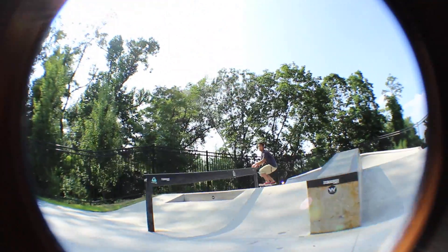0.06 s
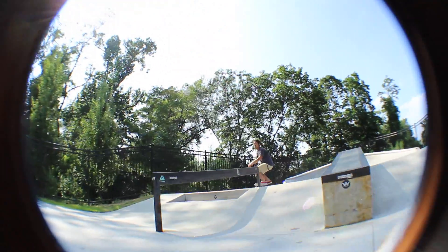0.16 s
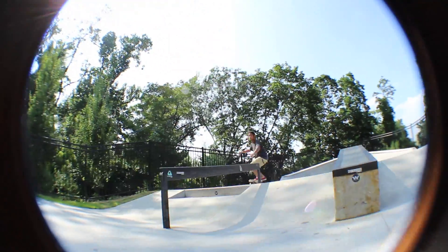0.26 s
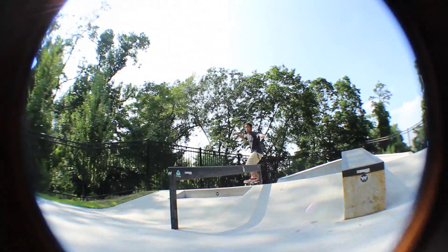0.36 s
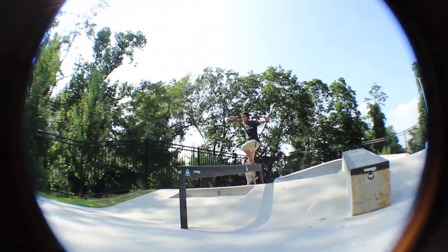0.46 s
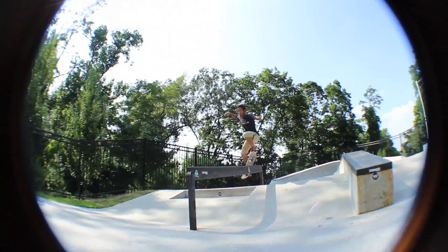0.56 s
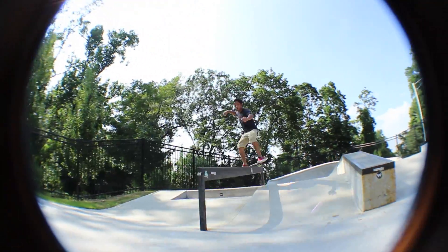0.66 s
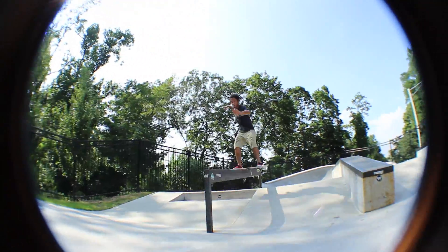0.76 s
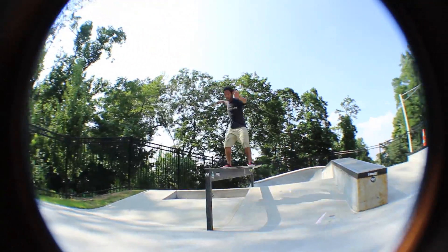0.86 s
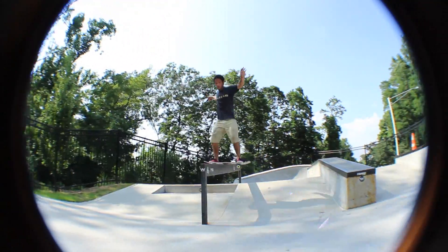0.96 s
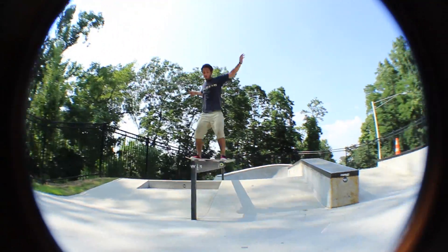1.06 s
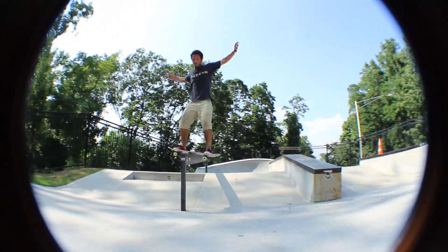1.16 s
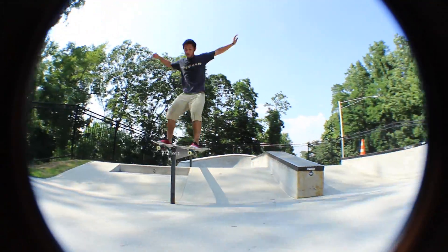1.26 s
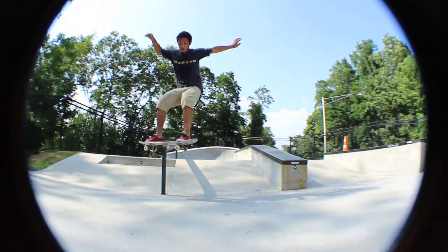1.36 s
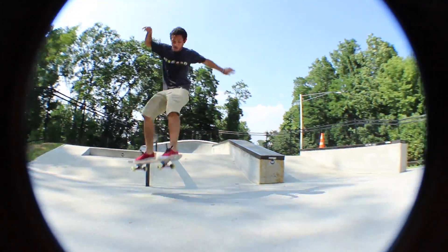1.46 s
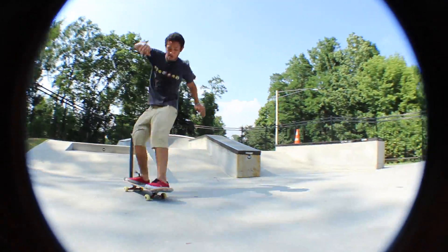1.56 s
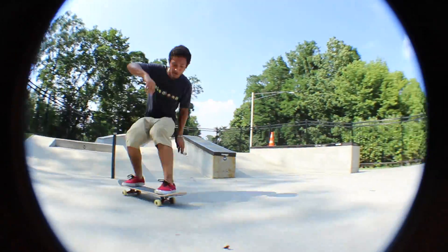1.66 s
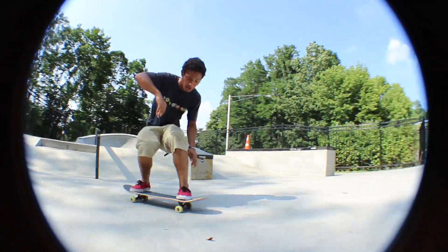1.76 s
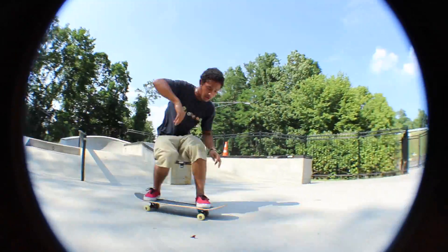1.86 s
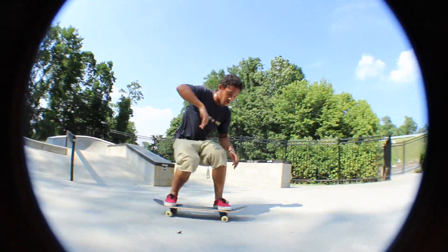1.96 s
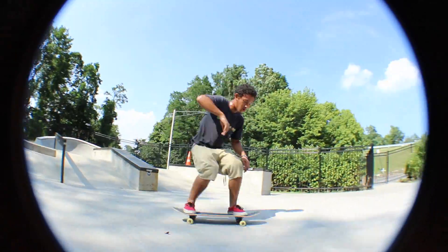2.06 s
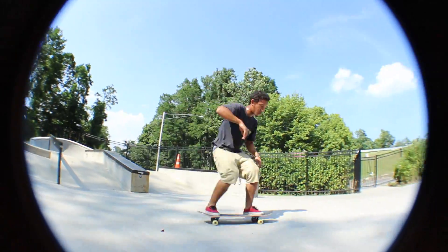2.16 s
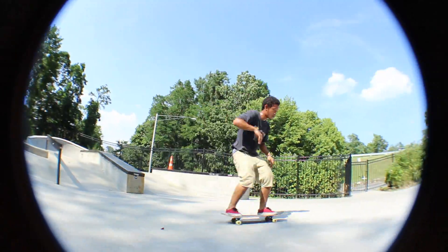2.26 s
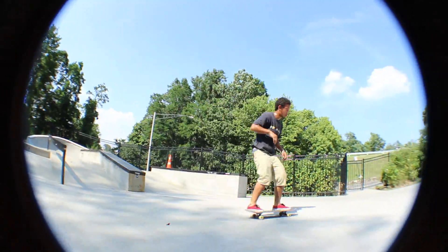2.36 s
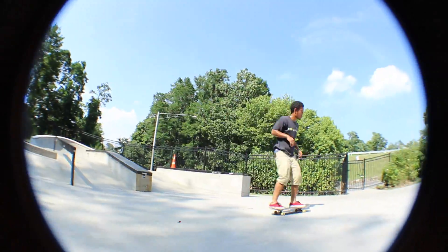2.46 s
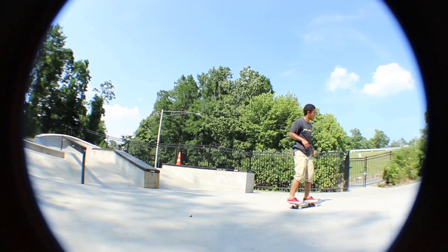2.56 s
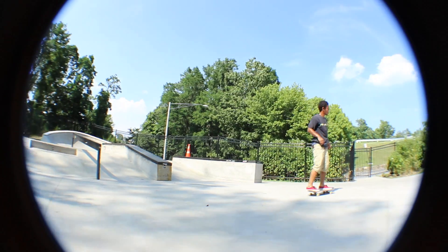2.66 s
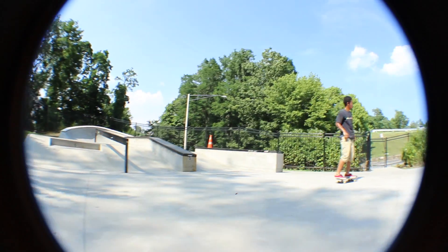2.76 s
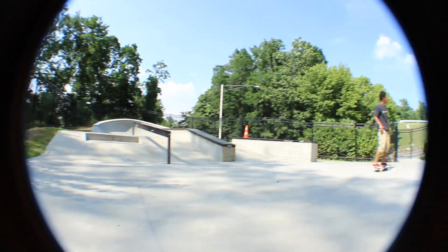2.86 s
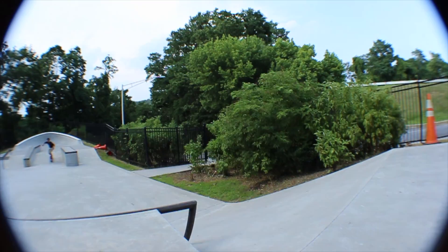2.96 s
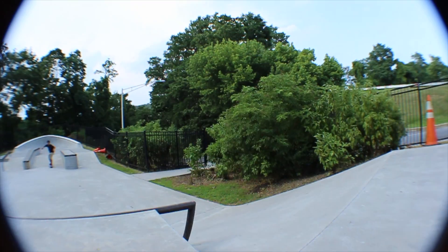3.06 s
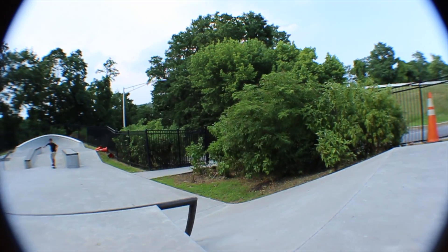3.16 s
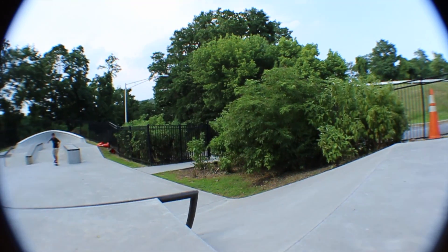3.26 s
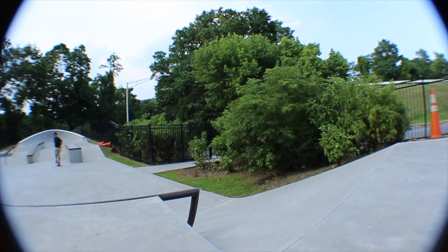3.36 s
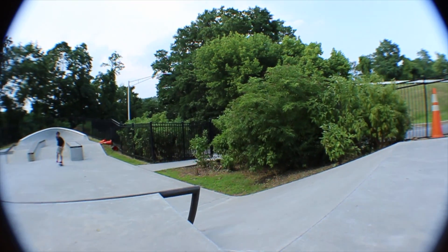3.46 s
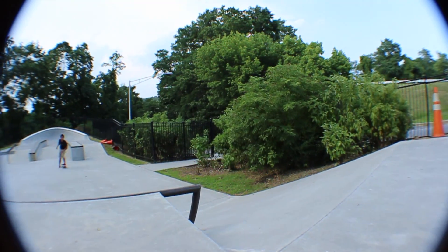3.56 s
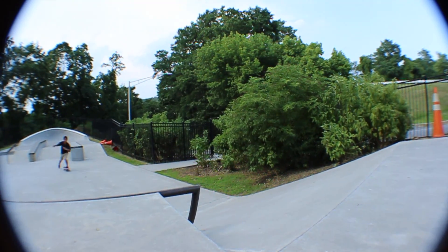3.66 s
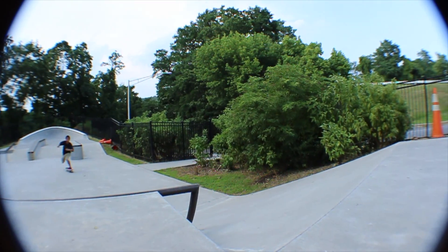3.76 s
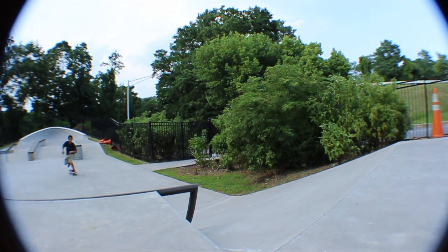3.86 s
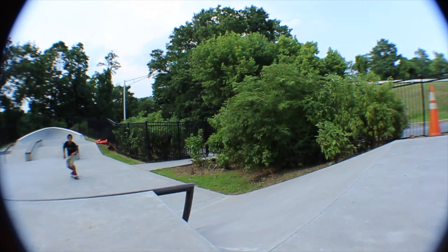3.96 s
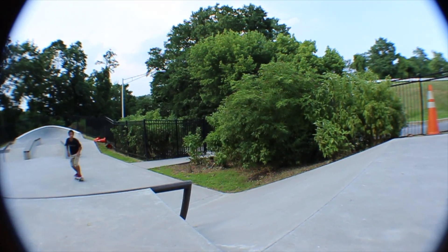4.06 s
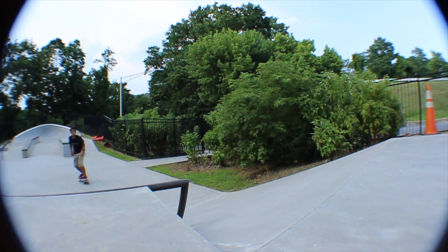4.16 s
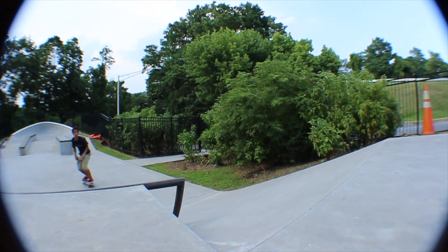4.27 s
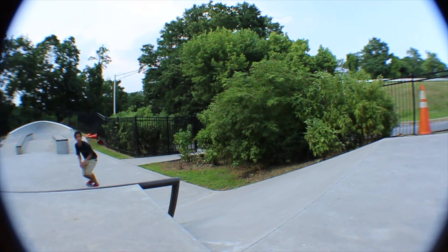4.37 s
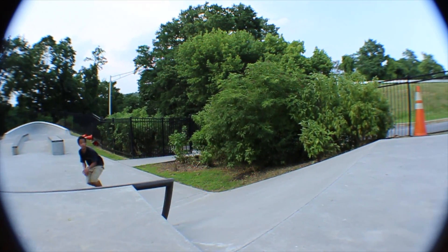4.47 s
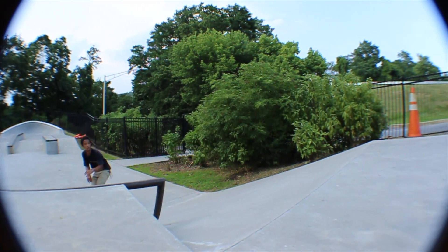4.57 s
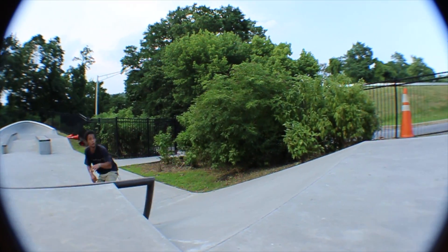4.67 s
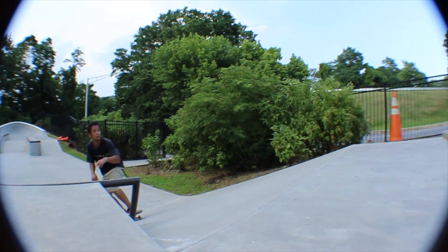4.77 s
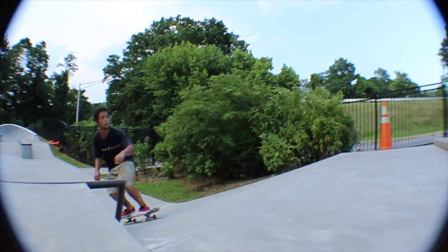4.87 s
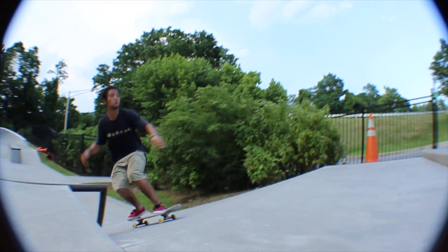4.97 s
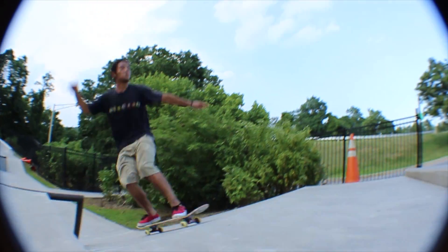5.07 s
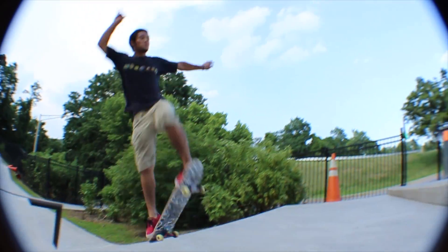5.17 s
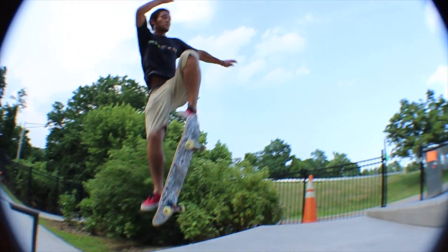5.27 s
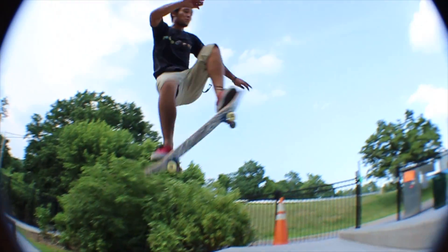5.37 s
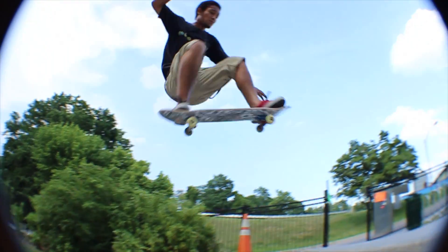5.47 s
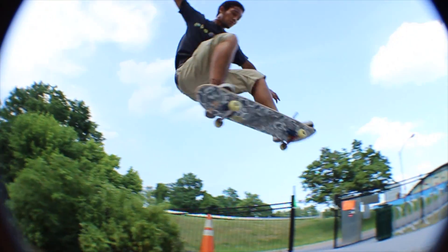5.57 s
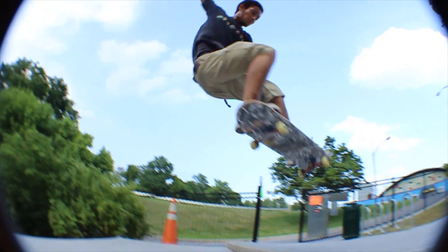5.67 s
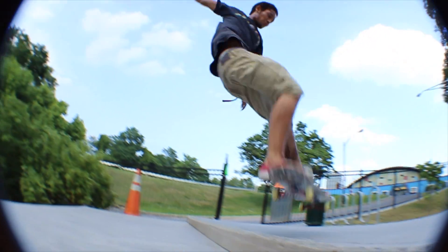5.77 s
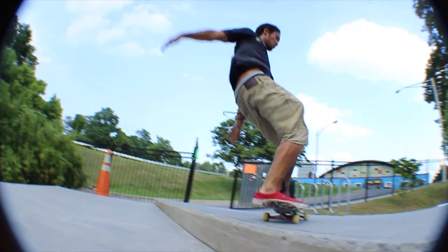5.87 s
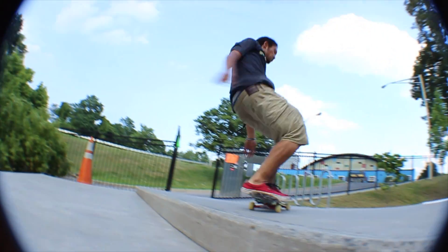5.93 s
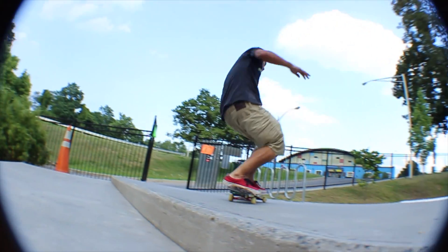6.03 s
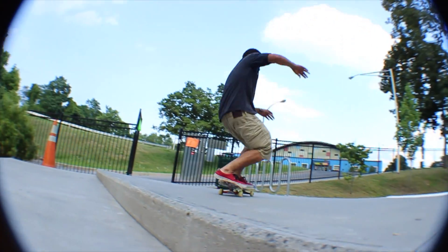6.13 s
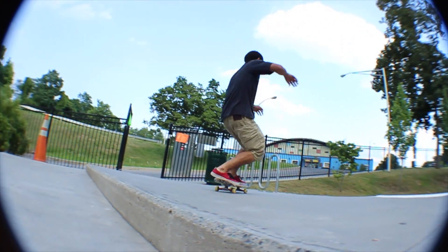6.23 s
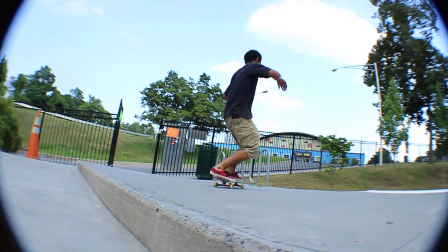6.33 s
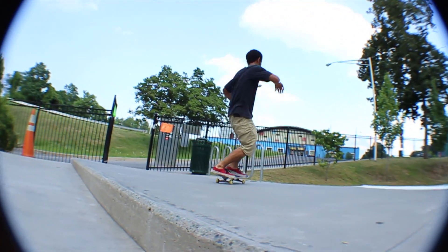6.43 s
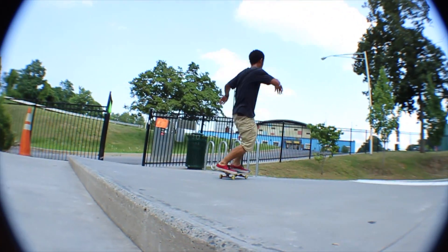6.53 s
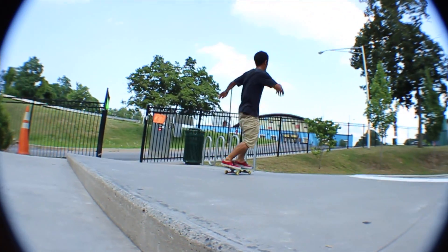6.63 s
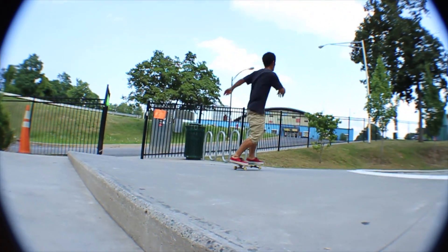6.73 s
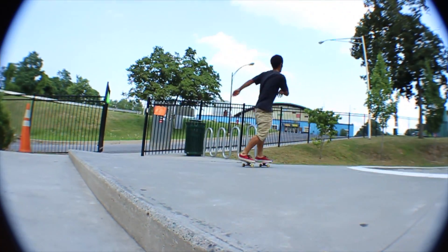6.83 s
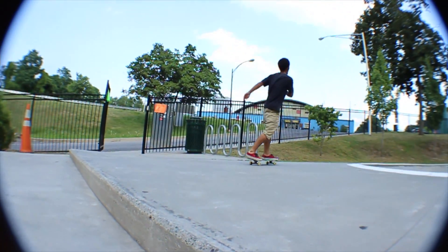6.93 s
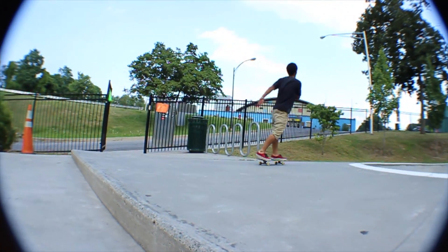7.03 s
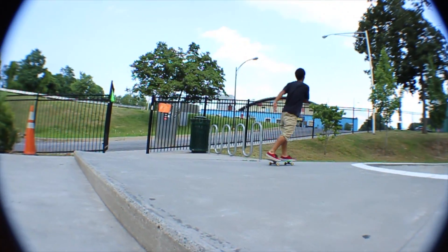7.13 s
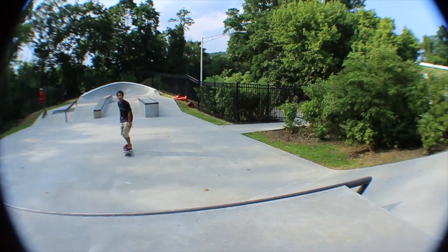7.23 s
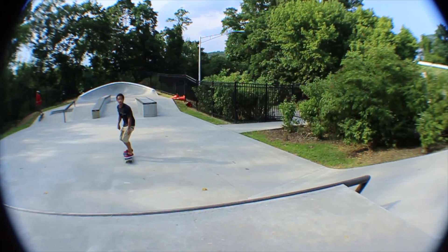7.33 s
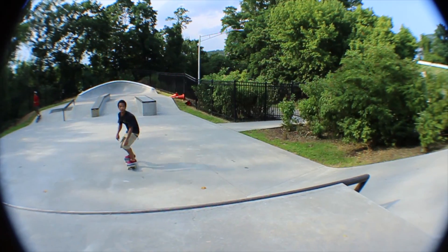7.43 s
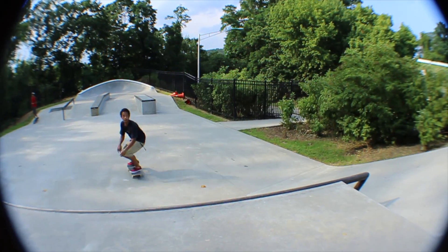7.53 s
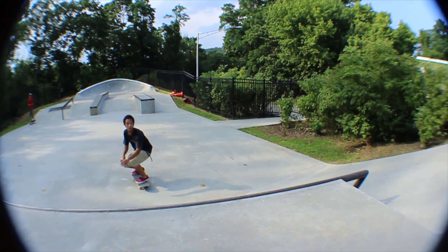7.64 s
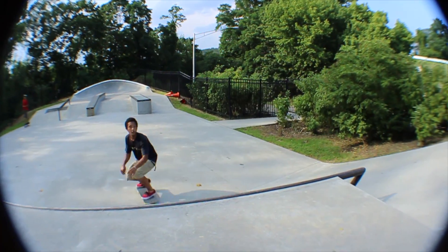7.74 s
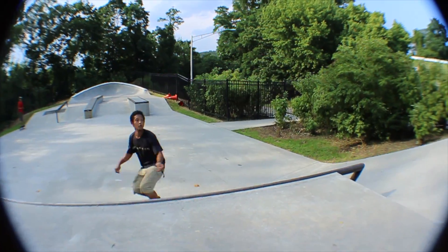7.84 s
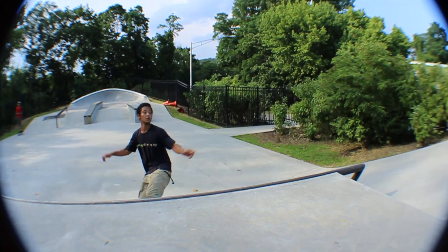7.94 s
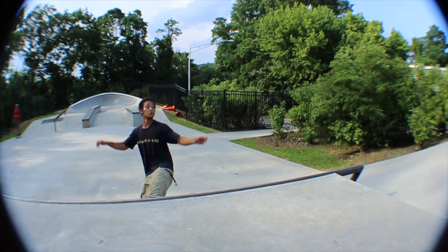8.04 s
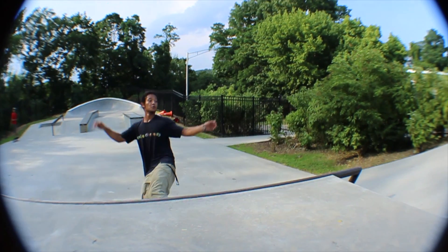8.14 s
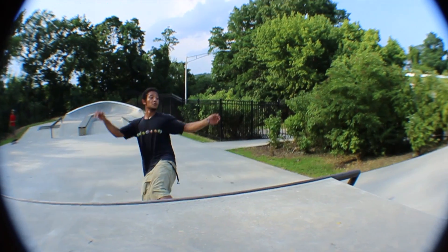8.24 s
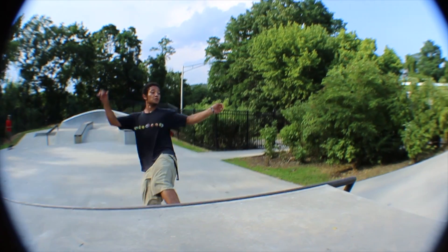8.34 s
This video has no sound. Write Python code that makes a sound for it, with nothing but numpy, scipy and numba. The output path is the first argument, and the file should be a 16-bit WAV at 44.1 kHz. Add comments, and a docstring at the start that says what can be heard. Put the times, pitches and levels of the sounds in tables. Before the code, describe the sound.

Skateboard wheels roar over skatepark concrete, a board clacks onto a ringing steel rail, then two loud landing clacks punctuate the rolling.

```python
"""A concrete skatepark, three shots in a row: a rail slide, a jump out of a bank, an approach.
Wheels roar as shaped noise and ring the deck through moving band-passes; grit and bearings hiss.
The board clacks as noise bursts ring its modes, a steel rail rings on, free wheels whirr in the air.
Distant traffic drones behind, with far hiss and wind low on the microphone.
The camera flattens the loud clacks, pulls its gain down fast and lets it creep back."""
import sys
import numpy as np
from scipy import signal
from scipy.fft import rfft, irfft, next_fast_len
from scipy.io import wavfile
from scipy.ndimage import uniform_filter1d
from numba import njit

SR = 44100
rng = np.random.default_rng(int(sys.argv[2]) if len(sys.argv) > 2 else 0)


def master(y):
    """Save y as 16-bit WAV."""
    cut = np.clip(np.atleast_2d(y).T, -1, 1)
    pcm = np.round(cut * 32767)  # scale
    wavfile.write(sys.argv[1], SR, pcm.astype(np.int16))


def field_ratio(decibels):
    """Amplitude ratio for a level in dB (20 dB per decade); scalars and array-likes work."""
    return 10 ** (np.asarray(decibels, dtype=float) / 20)


N = 370440
END_S = 7.95

# Wheel noise; new shots start at 2.97 and 7.24 s.
# Each row: time in seconds, wheel roar in dB, treble in dB (drives both grit and bearing hiss).
ROLL = [(0.0, -31.5, -44.5), (0.3, -28.5, -44), (0.55, -28, -40.5), (0.8, -31, -41), (1.0, -36, -46),
        (1.2, -30.5, -48), (1.375, -26, -36.5), (1.53, -29.5, -40), (1.7, -26, -37), (2.1, -26, -42),
        (2.5, -28.5, -41.5), (2.875, -31, -47.5), (2.969, -31, -49), (2.975, -27.5, -42.5),
        (3.125, -27, -39), (3.27, -32.5, -44), (3.39, -32, -44), (3.5, -25, -40.5), (3.625, -26.5, -37),
        (3.8, -29.5, -40), (4.3, -28, -39), (4.7, -28.5, -41), (5.0, -35, -37), (5.24, -26.5, -39),
        (5.375, -36, -37), (5.65, -31.5, -38.5), (5.875, -26.5, -37), (6.125, -29, -43), (6.4, -25, -42.5),
        (6.7, -27.5, -42.5), (7.0, -31, -50), (7.235, -34.5, -53), (7.25, -29, -39), (7.4, -29.5, -39.5),
        (7.65, -27.5, -37.5), (7.94, -30.5, -45)]
# Low rumble, rising and falling. Each row: time in seconds, level in dB.
LOW = [(0.0, -28.5), (0.5, -31), (0.88, -37), (1.1, -33.5), (1.375, -29.5), (1.55, -34), (2.25, -30),
       (2.55, -29), (2.82, -30.5), (2.85, -30), (2.92, -21), (2.97, -32.5), (3.1, -30), (3.25, -36.5),
       (3.45, -31.5), (4.4, -29.5), (4.8, -33.5), (5.12, -32), (5.27, -39.5), (5.6, -36.5), (5.9, -31),
       (6.55, -27.5), (7.0, -29), (7.24, -31), (7.4, -33), (7.7, -31), (7.94, -38)]
# Ring of the deck. Each row: time in seconds, level in dB, pitch in Hz.
DECK = [(0.0, -29, 530), (0.4, -31, 480), (0.7, -30.5, 580), (0.9, -32.5, 560), (1.1, -38, 603),
        (1.4, -31.5, 533), (1.8, -33.5, 555), (2.1, -33.5, 546), (2.9, -30.5, 542), (3.1, -39, 675),
        (3.25, -36, 660), (3.4, -39.5, 684), (3.8, -29, 623), (4.125, -27, 600), (4.25, -38, 650),
        (4.42, -26.5, 576), (4.52, -25.5, 560), (4.6, -28, 520), (4.7, -23, 540), (4.78, -25.5, 530),
        (4.86, -32.5, 540), (4.93, -24.5, 566), (5.02, -25.5, 524), (5.12, -29, 625), (5.17, -39.5, 610),
        (5.22, -27.5, 600), (5.7, -67, 660), (5.875, -31.5, 597), (6.2, -50.5, 621), (6.6, -36, 610),
        (6.85, -38, 680), (7.24, -36.5, 724), (7.244, -32.5, 480), (7.32, -32, 470), (7.35, -60, 500),
        (7.43, -51, 510), (7.45, -26, 510), (7.52, -36, 505), (7.6, -28, 519), (7.72, -24.5, 524),
        (7.85, -26.5, 506), (7.93, -23, 487)]
USUAL_TREBLE_DB, HISS_DB = -40, -48
HISS_STEEPNESS = 2.4  # dB of bearing hiss per dB of treble
AIR_GRIT_DB = -4  # grit is a little weaker while the wheels are off the ground

# Tail pops and landings. Each row: start in seconds, blow in dB, thud in dB re blow,
# crack in dB re blow, contact time in ms, crack pitch in Hz, favoured board tone in Hz.
HITS = [(0.5567, -1.5, -20, 1.5, 7.9, 3600, 950), (0.7560, 1, -14, -2, 5.5, 2400, 850),
        (1.6065, 15.5, -10.5, -6, 8.5, 2770, 950), (1.6186, 13.5, -25.5, -6, 8.4, 2760, 1405),
        (1.6263, 12.5, -18.5, -9.5, 4.6, 2900, 1300), (1.6419, 9, -10.5, -4, 3.8, 4280, 900),
        (5.125, -13, -17, -6.5, 2.5, 8010, 1203), (5.133, -11.5, -24.5, -13, 9.7, 2000, 990),
        (5.238, 10, -9, -8, 3.6, 5180, 1200), (5.2445, 3, -17.5, -6, 4, 4510, 1160),
        (5.8700, 18.5, -3, -8.5, 13.24, 2660, 660), (5.885, 12.5, -10.5, -8.5, 3.2, 3380, 550)]
# Small pitched knocks of the wheels and board, mostly over joints in the concrete.
# Each row: start in seconds, blow in dB, crack in dB re blow, contact time in ms, knock tone in Hz.
KNOCKS = [(0.715, -20.5, -35, 2.8, 1680), (1.4, -19.5, -4, 3.5, 1540), (3.1527, -4.5, -16, 3.8, 987),
          (3.2037, -7, -24.5, 3.2, 1070), (3.646, -15, -14, 3.2, 1250), (4.7443, -10, -41, 8.6, 1174),
          (5.0705, -14.5, -28, 2.3, 740), (6.124, -10, -47, 1.7, 1720), (6.2176, -14, -39, 3.13, 1600),
          (6.332, -12, -36, 3, 1580), (6.652, -13, -15, 2.1, 1600), (6.833, -3.5, -15, 9.1, 1593),
          (6.9025, -10.5, -12.5, 2, 1580), (7.1555, -19.5, -13, 1.4, 1220), (7.312, -21, -18, 9.6, 1100),
          (7.365, -15.5, -28, 7.5, 1518), (7.853, -11, -18, 13, 1130), (7.914, -5, -22.5, 7.7, 1180)]
KNOCK_THUD_DB, KNOCK_CRACK_HZ = -32, 3500  # thud re blow
# Modes of the wooden board. Each row: pitch in Hz, level in dB, free decay t60 in seconds.
BOARD = [(480, -6, .013), (670, -3, .012), (860, -3, .013), (1060, -2, .016), (1250, 0, .014),
         (1570, -2, .012), (1850, -4, .01), (2150, -5, .009), (2800, -5, .007), (3700, -5, .006),
         (5100, -8, .004)]
KNOCK_T60_SHARE = .55  # the board rings shorter in a small knock
RISE_MS = 1.2  # time constant of a blow's onset

# Modes of the steel rail. Each row: pitch in Hz, level in dB, decay t60 in seconds.
RAIL = [(343, -4.5, 1.5), (646, .5, 2.), (969, -9, .2), (1750, -12, .15), (2283, -9, .6), (2640, -11, .15),
        (2923, -9, .22), (3128, -7, .25), (3520, -11, .14), (3990, -5, .25), (4400, -13, .1)]
RAIL_HIT_S, RAIL_DB, RAIL_MUTED_S = .7558, -21.5, 1.22
# The deck grinds along the rail and leaves it.
# Each row: time in seconds, level in dB, scrape pitch in Hz.
GRIND = [(1.14, -62, 3810), (1.2, -53, 3850), (1.3, -45, 4150), (1.4, -47, 3800), (1.5, -46, 3670),
         (1.6, -42, 3550), (1.61, -91.5, 3550)]

# Wheels off the ground spin free and sing. Each row: start in seconds, end in seconds, level in dB.
AIR = [(1.114, 1.605, -49), (5.243, 5.868, -46)]
# Resonances of the free wheels. Each row: pitch in Hz, width in Hz, level in dB.
SPIN = [(2370, 340, 3), (3800, 690, -0.5), (5000, 300, -16.5), (6300, 800, -4.5), (9200, 1300, -6),
        (14600, 1800, -14)]
# Passing noise bands: rolling tones, deck hum, whirr in flight. Each row: start in seconds,
# end in seconds, centre in Hz, width of each of two filter passes in Hz, level in dB.
NOISE_BANDS = [(.25, 0.562, 3800, 997, -49.5), (.82, 1.14, 9600, 1206, -61.5),
               (1.0, 1.12, 13900, 704, -65.5), (1.108, 1.142, 13500, 1300, -55),
               (5.21, 5.242, 8400, 3500, -43.5), (3.497, 3.622, 4070, 400, -42.5),
               (3.6, 3.955, 340, 59.7, -33), (4.18, 4.356, 1630, 596, -29.5), (4.48, 4.563, 727, 90, -28),
               (4.555, 4.737, 1160, 110, -32), (4.547, 4.63, 1503, 80.4, -29.5),
               (4.784, 5.022, 715, 110.5, -28), (5.02, 5.15, 220, 60, -31.5), (3.45, 3.81, 5330, 900, -45),
               (3.9, 4.51, 5400, 698, -46.5), (3.95, 4.4, 4040, 500, -51), (4.0, 4.4, 8060, 900, -50),
               (4.5, 5.15, 5340, 900, -49), (4.88, 5.12, 7460, 1200, -50.5), (5.286, 5.5, 3560, 700, -41.5),
               (5.45, 5.569, 2370, 400, -39.5), (5.452, 5.87, 1510, 895, -36),
               (5.73, 5.858, 1800, 1000, -32.5), (5.565, 5.876, 3600, 700, -39),
               (5.62, 5.868, 6300, 500, -49), (6.2, 6.824, 1560, 500, -39), (6.2, 6.833, 3260, 1280, -45.5),
               (6.2, 6.824, 10200, 1810, -57), (7.243, 7.922, 5440, 1280, -43),
               (7.31, 7.397, 1540, 906, -29), (7.344, 7.457, 2110, 400, -31),
               (7.72, 7.824, 1230, 249.5, -31), (7.762, 7.88, 766, 140, -28)]
# Scattered tiny ticks, on the ground and in the air.
# Each row: start in seconds, end in seconds, ticks per second, smallest tick in dB.
TICKS = [(1.15, 1.6, 32, -42), (3.3, 5.2, 15, -38), (6.205, 6.86, 35, -25.5), (7.26, 7.898, 41, -29)]

# Soft low thumps: handling of the camera, and the weight of the landing.
# Each row: centre in seconds, level in dB, pitch in Hz.
THUMPS = [(2.517, -16, 142), (2.645, -18, 132), (2.744, -18, 240), (2.7575, -15, 160), (2.7755, -10, 290),
          (2.787, -16, 260), (2.797, -13, 170), (2.8135, -9, 115), (2.8195, -11, 190), (5.875, 0, 60)]
# Wind on the microphone builds and breaks off. One row: start in seconds, end in seconds, level in dB.
GUST = (2.72, 2.824, -23)
# Light wind flutters low on the microphone.
# Each row: start in seconds, end in seconds, level in dB before the flutter.
BREEZE = [(0.0, 0.406, -44.5), (1.909, 3.0, -44)]

# Tone colours of the rumble, the wheels, the bearings, the crack of a blow and the far hiss.
# Each row: frequency in Hz, level in dB per Hz.
RUMBLE = [(30, -14), (60, -4), (140, 5), (200, 4.5), (270, -0.5), (340, -1), (430, -5.5), (700, -59.5)]
ROAR = [(300, -31), (450, -1.5), (700, 1.5), (900, 4), (1150, 2.5), (1400, 0.5), (1900, -1.5),
        (2400, -13.5), (3500, -49)]
GRIT = [(1500, -7.5), (2500, 5), (3700, 4.5), (4600, 0.5), (5400, -3.5), (6600, -7), (8000, -15),
        (11000, -43.5)]
BEARINGS = [(5000, -0.5), (8000, 0), (10000, -1.5), (12500, -7), (15500, -9), (16300, -7), (17000, -33.5),
            (18000, -66)]
CRACK = [(1500, 4.5), (3500, 2.5), (6000, -17.5), (10000, -28), (16000, -20), (17500, -33)]
OUTDOORS = [(200, -16.5), (1000, -1), (2500, -5.5), (5000, -25), (9000, -28), (16000, -36.5),
            (17500, -58.5)]
OUTDOORS_DB = -42.5


def unit(x):
    """Scale to rms 1."""
    return x / np.sqrt(np.mean(x ** 2))


def colour(x, points):
    """Shape a signal by a spectrum of (Hz, dB) points, to rms 1."""
    hz, db = np.transpose(points)
    size = next_fast_len(len(x))
    log_f = np.log(np.arange(size // 2 + 1) * SR / size + 1)
    gain = field_ratio(np.interp(log_f, np.log(hz), db))
    return unit(irfft(rfft(x, size) * gain, size)[:len(x)])


def ring(x, hz, t60):
    """One decaying mode; a unit click rings it with amplitude 1."""
    pole = np.exp(2j * np.pi * hz / SR - np.log(1000) / (t60 * SR))
    return signal.lfilter([1], [1, -pole], x).imag


def band(x, hz, width):
    """Band-pass with a fixed centre."""
    return signal.lfilter(*signal.iirpeak(hz, hz / width, SR), x)


@njit
def svf(x, hz, width):
    """State-variable band-pass with a moving centre."""
    y, b, l = np.empty(len(x)), 0., 0.
    for i in range(len(x)):
        g, k = np.tan(np.pi * hz[i] / SR), width / hz[i]
        v = (b + g * (x[i] - l)) / (1 + g * (g + k))
        b, l, y[i] = 2 * v - b, l + 2 * g * v, k * v
    return y


def walk(rate):
    """Random levels held 1 / rate s and slewed twice; spread 1."""
    k = int(SR / rate)
    steps = np.repeat(rng.standard_normal(N // k + 1), k)
    return unit(uniform_filter1d(uniform_filter1d(steps, k), k)[:N])


def grains(scatter_db):
    """Grainy noise whose samples vary in size, as from the bumps and sand of concrete."""
    size = field_ratio(scatter_db * np.minimum(rng.exponential(size=N), 4))
    return unit(rng.standard_normal(N) * size)


def curves(table):
    """Columns of a (s, ..) table, joined by straight lines."""
    s, *columns = np.transpose(table)
    return [np.interp(np.arange(N) / SR, s, c) for c in columns]


def swell(a, b):
    """Rounded gate from a to b seconds."""
    return np.sin(np.pi * np.clip((np.arange(N) / SR - a) / (b - a), 0, 1)) ** 0.14


def rolling():
    """Wheels on concrete: grainy noise as roar, grit and bearing hiss, and a resonance for the deck."""
    (roar_db, treble_db), (deck_db, deck_hz) = curves(ROLL), curves(DECK)
    hiss_db = HISS_DB + HISS_STEEPNESS * (treble_db - USUAL_TREBLE_DB)
    t = np.arange(N) / SR
    grit_db = treble_db + AIR_GRIT_DB * sum((t > a) * (t < b) for a, b, _ in AIR)
    surface = walk(50)  # patches of rougher ground shake deck, wheels and grit together

    # the soft wheels pass only the low shaking on to the deck
    shake = colour(grains(scatter_db=3.), [(200, -12), (400, 0), (1400, 0), (2500, -25), (8000, -60)])
    drifting_hz = deck_hz * (1 + .025 * walk(25))
    deck = unit(svf(shake, drifting_hz, 130.))
    deck = deck + .25 * unit(svf(shake, 2.05 * drifting_hz, 200.))
    deck = deck * field_ratio(deck_db + 0.15 * surface + 1.5 * walk(45))

    roar = colour(grains(scatter_db=1.0), ROAR) * field_ratio(roar_db + 0.28 * surface + 1.1 * walk(60))
    grit = colour(grains(scatter_db=2.5), GRIT) * field_ratio(grit_db + 0.42 * surface + 1.2 * walk(80))
    hiss = colour(grains(scatter_db=3.5), BEARINGS) * field_ratio(hiss_db + 0.31 * surface + 1.4 * walk(80))
    return deck + roar + grit + hiss


def strike(blow_db, thud_db, crack_db, contact_ms, crack_hz, tone_hz, pitched):
    """A blow scrapes for its contact time: board modes, a slap, a low thud and a brief crack."""
    size = 8192
    t = np.arange(size) / SR
    force = np.exp(-(t / (contact_ms / 1000)) ** 2)
    push = rng.standard_normal(size) * force * (1 - np.exp(-t / (RISE_MS / 1000)))
    t60_share = KNOCK_T60_SHARE if pitched else 1

    body = 0
    scatter = rng.standard_normal((len(BOARD), 2)) * [1.5, .06]  # dB, share of pitch
    for (hz, mode_db, t60), (off_db, off_pitch) in zip(BOARD, scatter):
        # where the board is struck picks the modes; a soft blow with little crack picks fewer
        mode_db = mode_db + off_db + 2.0 * min(crack_db, 0) * abs(np.log2(hz / tone_hz))
        y = ring(push, hz * (1 + off_pitch), t60_share * t60)
        body = body + field_ratio(mode_db) * np.sqrt(t60) * y / np.abs(y).max()
    if pitched:  # a steady tone sounds for as long as the contact lasts
        knock = np.sin(2 * np.pi * (tone_hz * t + rng.random()))
        knock = knock * force * (1 - np.exp(-3000 * t / contact_ms))
        body = .6 * body / np.abs(body).max() + 1.8 * knock
    body = body / np.abs(body).max()
    # the slap fills the gaps between modes
    slap = .5 * field_ratio(1.6 * crack_db) * force * colour(rng.standard_normal(size), ROAR)

    thud = np.gradient(ring(rng.standard_normal(size) * force, 269, 0.011))
    thud = signal.lfilter([.2], [1, -.8], thud / np.abs(thud).max())  # softened

    snap = rng.standard_normal(size)
    crack = colour(snap, CRACK) * (np.exp(-t / 0.0012) + 0.38 * force)
    crack = crack + 0.52 * unit(band(snap, crack_hz, 1100)) * np.exp(-t / 0.0025)
    crack = crack * (1 - np.exp(-t / 0.00034))
    return field_ratio(blow_db) * (body + slap + field_ratio(thud_db) * thud + field_ratio(crack_db) * crack)


def place(blows):
    """Lay (start in seconds, sound) pairs on the timeline."""
    out = np.zeros(N + 8192)
    for s, sound in blows:
        i = int(s * SR)
        out[i:i + len(sound)] += sound
    return out[:N]


def clacks():
    """Tail pops and landings ring the board modes at their full decay."""
    return place([(s, strike(*settings, pitched=False)) for s, *settings in HITS])


def knocks():
    """Small knocks of the wheels and board: one pitched tone on top of shortened board modes."""
    return place([(s, strike(db, KNOCK_THUD_DB, crack_db, ms, KNOCK_CRACK_HZ, hz, pitched=True))
                  for s, db, crack_db, ms, hz in KNOCKS])


def rail():
    """The steel rail rings on after the board chatters down onto it; each mode is a close, beating trio."""
    size = 2 * SR
    t = np.arange(size) / SR - RAIL_HIT_S
    force = rng.standard_normal(size) * (t > 0) * np.exp(-np.abs(t) / 0.008)
    out = 0
    for hz, db, t60 in RAIL:
        for near, near_db in [(1, 0), (1.016, -9), (.982, -10)]:
            y = ring(force, hz * near, t60)
            # the sliding board roughens each ring
            level = field_ratio(RAIL_DB + db + near_db + 2.2 * walk(60)[:size])
            out = out + level * y / np.abs(y).max()
    chatter = colour(rng.standard_normal(size), [(500, -10), (1500, -6.5), (3000, -1.5), (4600, 4),
                                                 (5500, -4), (12000, -30)])
    out = out + field_ratio(-25.) * chatter * (t > 0) * np.exp(-np.abs(t) / 0.022)
    # the board at last mutes the rail
    muting = np.clip((RAIL_MUTED_S - RAIL_HIT_S - t) / .08, 0, 1)
    return np.pad(out * muting, (0, N - size))


def grind():
    """The deck scrapes the rail: broad, grainy noise through a resonance that rises, then sinks."""
    db, hz = curves(GRIND)
    scrape = unit(svf(grains(scatter_db=5.0), hz * (1 + .03 * walk(30)), 600.))
    return scrape * field_ratio(db + 2.5 * walk(43)) * (np.arange(N) / SR > GRIND[0][0])


def spinning():
    """Free wheels whirr in their bearings while the board flies: noise through fixed resonances."""
    t, noise = np.arange(N) / SR, grains(scatter_db=4.0)
    whirr = sum(field_ratio(db) * unit(band(noise, hz, width)) for hz, width, db in SPIN)
    gate = sum(field_ratio(db) * np.clip((t - a) / 0.046, 0, 1) * (t < b) for a, b, db in AIR)
    return whirr * gate * field_ratio(1.5 * walk(40))


def noise_bands():
    """Rolling tones, deck hum and whirr in flight: short bands of grainy noise, each filtered twice."""
    noise = grains(scatter_db=6.0)
    out = 0
    for a, b, hz, width, db in NOISE_BANDS:
        y = band(band(noise, hz, width), hz, width)
        # evened out, so that narrow bands hum on
        steady = unit(y / uniform_filter1d(np.abs(y) + 1e-9, size=500) ** .4)
        out = out + field_ratio(db) * swell(a, b) * steady
    return out * field_ratio(0.5 * walk(50))


def tiny_ticks():
    """Scattered tiny ticks, broad in pitch: random single samples with three short rings."""
    t, chance = np.arange(N) / SR, rng.random(N)
    size = field_ratio(3 * np.minimum(rng.exponential(size=N), 3))
    ticks = sum(field_ratio(db) * size * (chance < rate / SR) * (t > a) * (t < b) for a, b, rate, db in TICKS)
    rings = .5 * ring(ticks, 6000, .002) + .4 * ring(ticks, 10000, .002) + .6 * ring(ticks, 1700, .005)
    return ticks + rings


def thumps():
    """Soft low thumps of handling and landing: low tones under a bell some milliseconds wide."""
    t, width_s = np.arange(N) / SR, .004
    return sum(field_ratio(db) * np.exp(-((t - s) / width_s) ** 2) * np.cos(2 * np.pi * hz * (t - s))
               for s, db, hz in THUMPS)


def gust():
    """A puff of wind on the microphone: low noise that builds and breaks off."""
    start, end, db = GUST
    t = np.arange(N) / SR
    wind = colour(rng.standard_normal(N), [(40, -2), (150, -7), (250, 13), (400, 10), (600, -18),
                                           (1200, -41.0)])
    build = np.clip((t - start) / (end - start), 0, 1) ** 0.49
    return field_ratio(db) * build * np.clip((end - t) / 0.0042, 0, 1) * wind


def breeze():
    """Light wind: noise around 45 Hz, fluttering in level."""
    low = band(band(rng.standard_normal(N), 45, 50), 45, 50)
    flutter = unit(low) * field_ratio(9.5 * walk(6))
    return flutter * sum(field_ratio(db) * swell(a, b) for a, b, db in BREEZE)


def rumble():
    """Low noise, rising and falling: the bottom of the wheels over the drone of distant traffic."""
    low_db, = curves(LOW)
    return colour(rng.standard_normal(N), RUMBLE) * field_ratio(low_db + 0.4 * walk(19))


def outdoors():
    """Smooth far hiss of leaves and road."""
    return field_ratio(OUTDOORS_DB) * colour(rng.standard_normal(N), OUTDOORS)


def park(x):
    """Ramps and walls return a short diffuse tail."""
    t = np.arange(int(.3 * SR)) / SR
    tail = colour(rng.standard_normal(len(t)), [(100, -5.5), (1000, -4.0), (4000, -1.0), (12000, -5.5)])
    tail = tail * np.exp(-t * np.log(1000) / 0.06) * (t > .006)  # t60 60 ms, after a 6 ms gap
    return x + field_ratio(-28.5) * signal.fftconvolve(x, tail)[:N]


@njit
def leveller(x, clip, top, smooth, fall_db, rise_db):
    """Gain falls at a limited speed while the clipped output is too loud, and creeps back to full."""
    y, gain_db, loud = np.empty(len(x)), 0., 0.
    for i in range(len(x)):
        y[i] = min(max(x[i] * 10 ** (gain_db / 20), -clip), clip)
        loud += smooth * (abs(y[i]) - loud)
        excess = min(max(loud / top - 1, 0.), 1.)
        gain_db = min(gain_db + rise_db - fall_db * excess, 0.)
    return y


def scene():
    """All sources at the microphone; the walls answer the blows and the rail."""
    board = rolling() + spinning() + grind() + noise_bands() + tiny_ticks()
    echoing = park(clacks() + knocks() + rail())
    low_bursts = thumps() + gust() + breeze()
    return (board + echoing + low_bursts + rumble() + outdoors())[None]


def roll_off(x):
    """The treble ends steeply here."""
    return signal.sosfilt(signal.butter(12, 17860, fs=SR, output="sos"), x)


def record(dry):
    """The camera: bass cut, gain control with clipping, the top cut off, then the shot ends."""
    y = signal.sosfilt(signal.butter(2, 35, "high", fs=SR, output="sos"), dry[0])
    # loudness follows in 1.4 ms; gain speeds in dB per sample
    y = leveller(y, clip=.4, top=0.11, smooth=1 / (0.0014 * SR), fall_db=1500 / SR, rise_db=28 / SR)
    y = signal.sosfilt(signal.butter(8, 16600, fs=SR, output="sos"), y)
    y = signal.sosfilt(signal.butter(1, 8, "high", fs=SR, output="sos"), y)
    y = y * np.clip((END_S - np.arange(N) / SR) / .008, 0, 1)
    return roll_off(y[None])


dry = scene()
out = record(dry)
master(out)
```